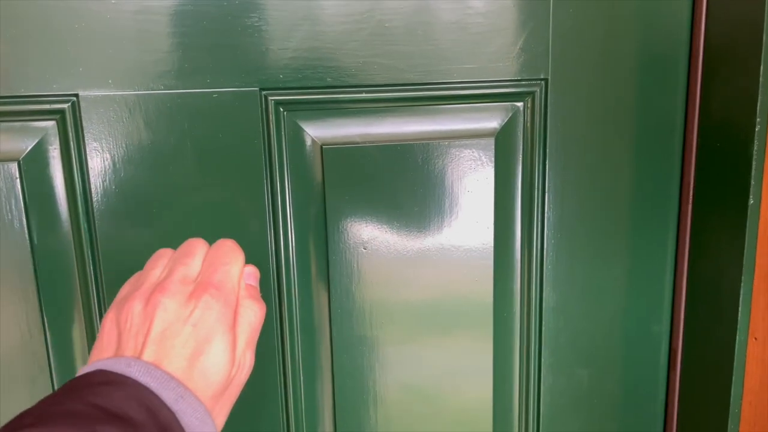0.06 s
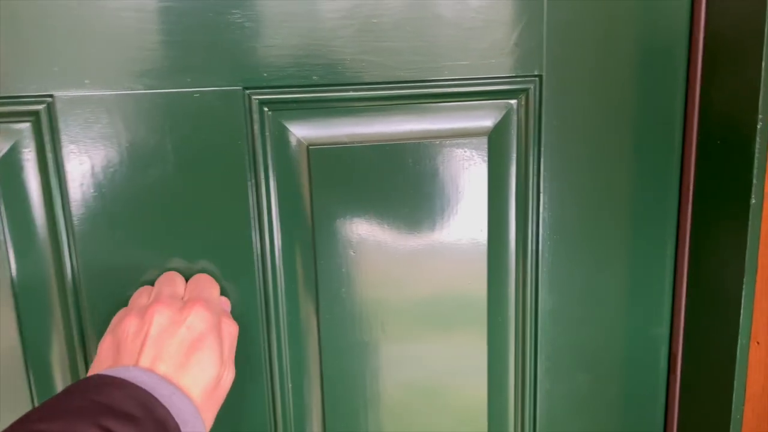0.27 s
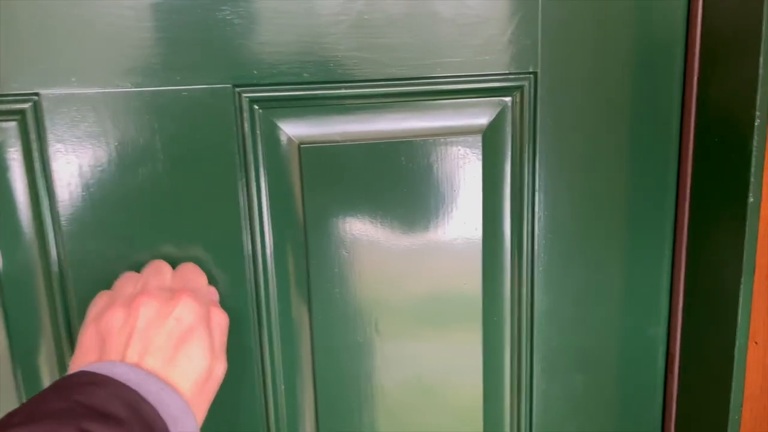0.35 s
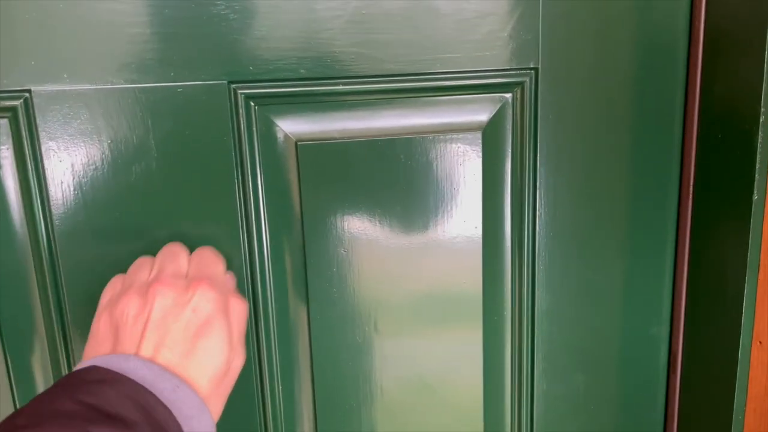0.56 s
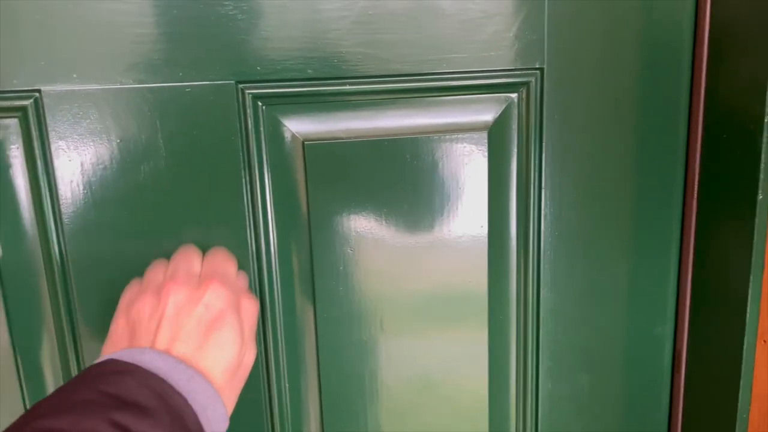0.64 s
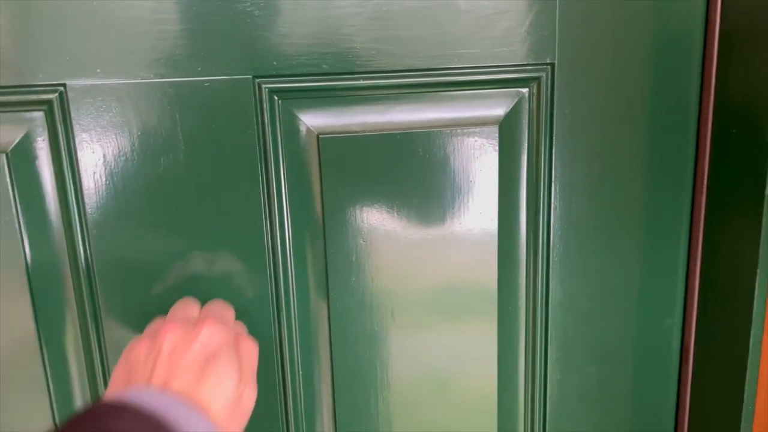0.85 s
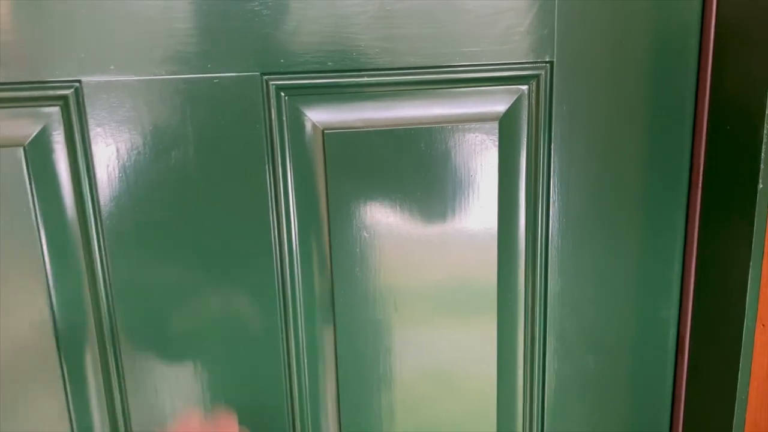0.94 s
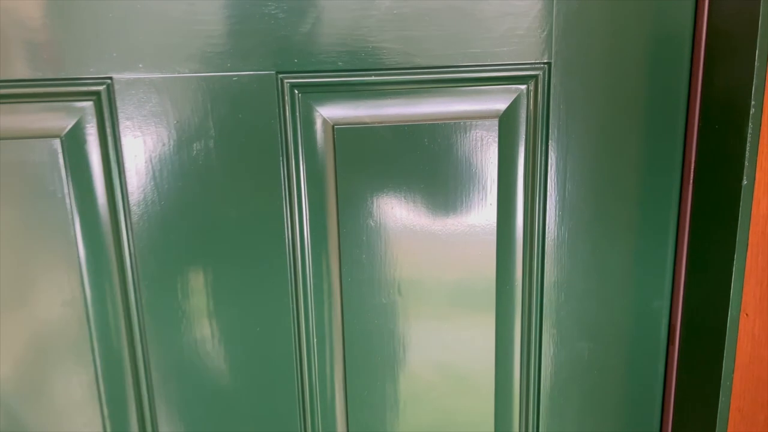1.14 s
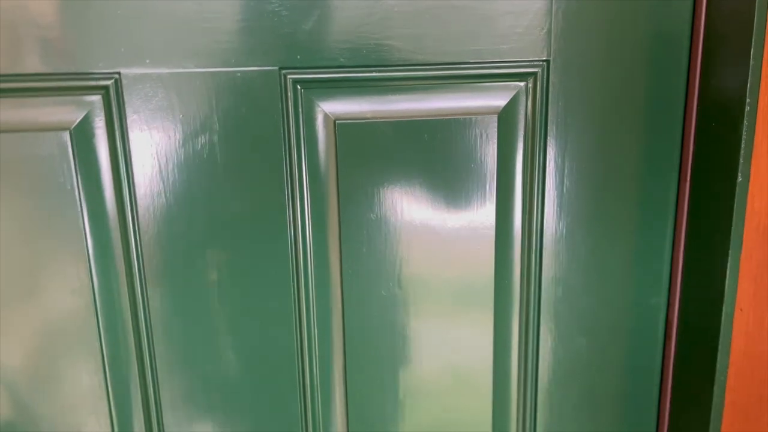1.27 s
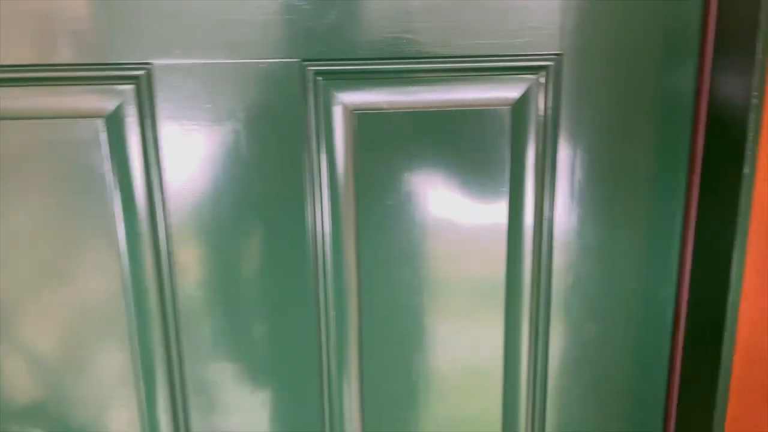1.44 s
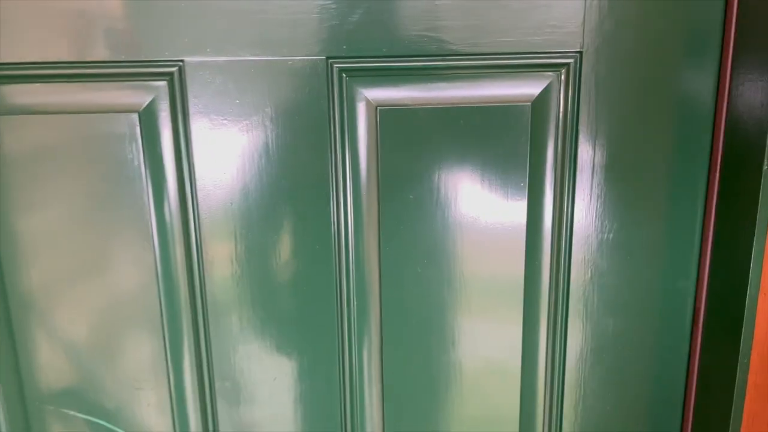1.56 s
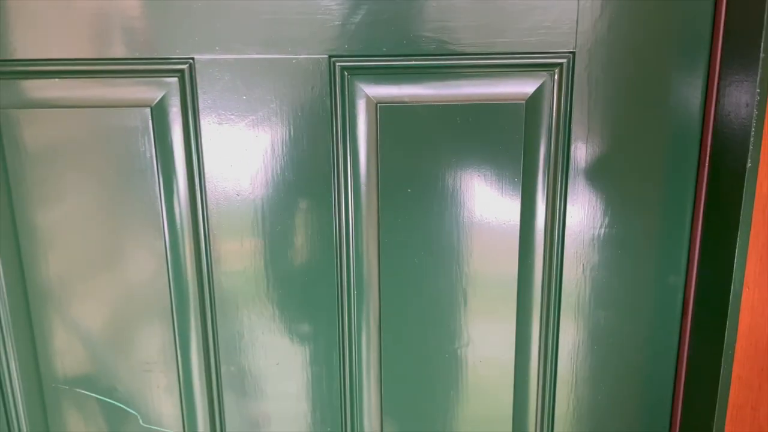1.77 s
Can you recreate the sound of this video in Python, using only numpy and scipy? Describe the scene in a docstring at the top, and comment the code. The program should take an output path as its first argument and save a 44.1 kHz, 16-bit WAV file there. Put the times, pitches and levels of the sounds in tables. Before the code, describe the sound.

Three evenly spaced knuckle knocks on a wooden panelled door, boomy with a dry bony tick, then a jacket sleeve rustles and feet shift on the floor; close stereo microphone in a small porch, faint outdoor air.

```python
"""Knocks on a panelled door

Three quick knuckle knocks on wood, heard in stereo from close by in a small porch.
The door is sine modes with a gliding boom; panels, porch echo and paint clicks are dying noise bands.
A sleeve rustles as shaped noise, loudest when the arm drops; feet shift, ringing the floor's modes.
Outdoors lie soft noise bands and a wavering low drone, with a few dull low bumps."""
import sys
import numpy as np
from scipy import signal
from scipy.fft import rfft, irfft
from scipy.io import wavfile
from scipy.ndimage import map_coordinates

SR = 44100
rng = np.random.default_rng(int(sys.argv[2]) if len(sys.argv) > 2 else 0)


def master_out(mix):
    """Clip the mix to full scale and print it as 16-bit PCM to the path in sys.argv[1]."""
    frames = np.transpose(np.atleast_2d(mix))
    ceiling = np.clip(frames, -1, 1)
    pcm = np.round(ceiling * 32767).astype(np.int16)
    wavfile.write(sys.argv[1], SR, pcm)


N = 79380
T = np.arange(N) / SR
BANDS_HZ = 25 * 2 ** np.arange(0, 9.6, .5)  # half-octave centres
BIN_HZ = np.maximum(np.arange(N // 2 + 1) * SR / N, 1)

# Outdoor air, before its swells. Each row: frequency in Hz, level in dB per half octave.
AIR_SPECTRUM = [(25, -83), (36, -63.5), (50, -54.5), (85, -46), (130, -50), (200, -60), (300, -58.5),
                (500, -64), (1000, -61.5), (1900, -58.5), (2600, -70.5), (4500, -78), (7500, -94.5),
                (14000, -102)]
# Rise and fall of the air. Each row: time in seconds, low-mid change in dB, upper-mid change in dB.
AIR_LEVEL = [(0, 16.5, 9), (0.151, -7, -3), (0.401, -3.5, -6), (.58, -1, 7), (0.852, -2.5, -4),
             (1.1, -8, -0.5), (1.5, 0.5, -3.5), (1.65, -3.5, -3), (1.8, -5, 1)]
AIR_LOW_HZ, AIR_UPPER_HZ = 232, 1800  # centres of those two regions
# Drone of a distant machine, before its wavering. Each row: frequency in Hz, level in dB.
DRONE_TONES = [(40.8, -37), (83, -38.5)]
AIR_PAN_DB, AIR_SWELL_DB, DRONE_WAVER_DB = 2.5, 3, 0.5
DRONE_DRIFT = .015  # fraction of the frequency

# Soft low bumps. Each row: start in seconds, level in dB.
BUMPS = [(0.0, -20), (0.086, -25.5), (1.234, -27), (1.548, -21.5)]
BUMP_HZ, BUMP_S = 85.2, 0.038

# Movement of the sleeve. Each row: time in seconds, level in dB.
SLEEVE_MOVE = [(0, -44.5), (.18, -19.5), (.4, -32), (.56, -27.5), (.81, -27.5), (.89, -16), (1.06, -17.5),
               (1.19, -11), (1.23, -4), (1.34, -5.5), (1.39, -9), (1.48, -14), (1.53, -6.5), (1.62, -21),
               (1.8, -14.5)]
# Cloth rubbing, before the movement. Each row: frequency in Hz, level in dB per half octave.
CLOTH_SPECTRUM = [(400, -71.5), (1000, -46), (2000, -53), (3800, -52), (5500, -54), (8000, -59.5),
                  (11000, -53), (14000, -51)]
CLOTH_GRAIN_DB, CLOTH_GRAIN_HZ = 1.5, 93

# Knocks. Each row: start in seconds, level in dB, hardness in dB at 1.5 kHz, boom level in dB.
KNOCKS = [(0.2059, -3.5, -3, -3.5), (0.4413, -1.5, -2, -2), (0.6769, -1, 5, 0.5)]
# Modes of the door, before each knock's level. Each row: frequency in Hz, level in dB, t60 in seconds.
DOOR_MODES = [(51.3, -15.5, 0.46), (112.1, -20, 0.56), (144, -23.5, 0.43), (187.1, -20, 0.29),
              (257.3, -13.5, .22), (276, -14, .2), (308.6, -19, 0.25), (334.4, -15.5, 0.23),
              (359, -18.5, 0.11), (396.7, -29, 0.27), (432, -20, .18), (516.8, -22.5, 0.22),
              (547, -14.5, 0.15), (602, -26, 0.17), (639.4, -23, 0.13), (768, -22, 0.1), (945, -28, 0.14),
              (1023.6, -28.5, 0.12), (1080, -30, 0.067), (1347, -39, 0.085), (1622, -44.5, .12),
              (1830, -34.5, 0.22), (2035, -27.5, 0.075), (2278, -39, 0.037)]
# Dense ring of panels and frame, likewise. Each row: frequency in Hz, level in dB, t60 in seconds.
PANEL_RING = [(117, -19, 0.061), (346, -14, 0.18), (620, -18.5, 0.045), (1000, -24, 0.088),
              (1400, -27.5, 0.095), (1760, -29.5, 0.1), (2760, -51.5, 0.045), (5000, -63.5, 0.074)]
# Echo of the porch, likewise. Each row: frequency in Hz, level in dB, t60 in seconds.
PORCH_ECHO = [(150, -28.5, 0.14), (342, -32, 0.39), (600, -32.5, 0.27), (1010, -32, .19),
              (1860, -39.5, 0.12), (2800, -54, 0.14), (5000, -67.5, 0.45)]
BEND_LAG_S = 0.00573  # arrival of bending waves at 100 Hz; higher ones come sooner
RISE_CYCLES = .8  # build-up of a mode
MODE_SCATTER_DB = 1  # each blow excites the modes a little differently
PANEL_RISE_S, PORCH_RISE_S = 0.004, 0.021
DOOR_PAN_DB, PANEL_PAN_DB = 2.5, 3.5  # left over right
WOOD_LAG_S = .0003  # right microphone after left
# The leaf's boom starts high and settles as the slower bending waves arrive.
BOOM_HZ, BOOM_START_HZ, BOOM_SETTLE_S = 75.7, 157, 0.0083
BOOM_DB, BOOM_LAG_S, BOOM_RISE_S, BOOM_HOLD_S, BOOM_T60_S = -6, 0.0029, 0.0035, 0.035, 0.3

# Single knuckles on the paint. Each row: start in seconds, level in dB.
CLICKS = [(0.2111, -4), (0.2133, 0), (0.2168, -14), (0.223, -8.5), (0.4448, -16), (0.449, -12.5),
          (0.6793, -13), (0.685, -5)]
# Dry tick of bone on paint. Each row: frequency in Hz, level in dB, t60 in seconds.
CLICK_TICK = [(1500, -32, 0.0083), (2800, -33.5, 0.015), (4400, -34, 0.029), (7030, -46, 0.012),
              (12040, -39.5, 0.01), (15200, -50.5, .014)]
# Echo of the click. Each row: frequency in Hz, level in dB, t60 in seconds.
CLICK_ECHO = [(2000, -56, 0.11), (3200, -50, 0.14), (4600, -42.5, 0.086), (7500, -64.5, .09),
              (12000, -51, .08)]
CLICK_RISE_S, CLICK_ECHO_LAG_S, CLICK_PAN_DB = 0.001, .002, -2
SNAP_DB, SNAP_HZ, SNAP_T60_S = -24.5, 11400, 0.00081  # first touch of bone on the hard paint

# Footfalls and scuffs.
# Each row: start in seconds, level in dB, brightness in dB at 1.5 kHz, rise in seconds, floor ring in dB.
STEPS = [(1.2, -5.5, 17, 0.025, -7), (1.258, 2, -1, 0.0008, -8), (1.313, -2.5, -2.5, 0.0036, 3.5),
         (1.333, -3, 3, 0.0024, -2), (1.7079, -6.5, -14, 0.0011, -11)]
# Modes of the floor, before each step's level. Each row: frequency in Hz, level in dB, t60 in seconds.
FLOOR_MODES = [(250.6, -29, .25), (332.4, -35.5, 0.345), (371, -32, 0.13), (548, -71, .13), (649, -44, .2),
               (740, -67, 0.14)]
# Scuff of a sole, before each step's level. Each row: frequency in Hz, level in dB, t60 in seconds.
SOLE_SCUFF = [(101, -68, .15), (202, -49, 0.6), (360, -30.5, 0.1), (750, -47, 0.31), (1260, -46, .14),
              (2480, -55, 0.09), (5000, -63, 0.14)]

# How unlike the two channels are. Each row: frequency in Hz, side level relative to mid in dB.
WIDTH = [(40, -24), (150, -9), (400, -6), (1000, 2.5), (5000, -1.5), (9000, 3.5), (14000, -18)]
# The left microphone is more sensitive in the treble. Each row: frequency in Hz, left over right in dB.
MIC_BALANCE = [(2000, 0.5), (3200, 3.5), (5000, 10), (7000, 3.5), (9000, -0.5)]
LOW_CUT_HZ, TOP_HZ = 24.3, 14500


def amp(db):
    """Decibels to gain."""
    return 10 ** (np.asarray(db) / 20)


def at(table, hz, col=1):
    """Read a column of a table on a log-frequency axis."""
    rows = np.array(table, float)
    return np.interp(np.log(hz), np.log(rows[:, 0]), rows[:, col])


def pan(db):
    """Gains for left and right, db apart."""
    return amp(np.array([[db], [-db]]) / 2)


def walk(hz):
    """Smooth chance with a spread near one, through hz random points a second."""
    return map_coordinates(rng.standard_normal(1000), [T * hz], order=3, mode="mirror")


def delay(x, s):
    """Both channels, s seconds later."""
    samples = max(int(s * SR), 0)
    return np.pad(x, ((0, 0), (samples, 0)))[:, :N]


def fade(t60, t=T):
    """Exponential decay by 60 dB in t60 seconds."""
    return np.exp(-np.log(1000) * t / t60)


def bands(table):
    """Half-octave stereo noises of unit level over a table's range, their width set by frequency."""
    mid, side = rfft(rng.standard_normal((2, N)))
    width = amp(at(WIDTH, BIN_HZ))
    both = mid + width * side * np.array([[1], [-1]])
    lowest, highest = table[0][0] / np.sqrt(2), table[-1][0] * np.sqrt(2)
    for hz in BANDS_HZ:
        if lowest < hz < highest:
            offset = np.clip(2 * np.log2(BIN_HZ / hz), -1, 1)
            noise = irfft(both * np.cos(np.pi / 2 * offset) ** 2, N)
            yield hz, noise / noise.std()


def air_db(hz):
    """Level of one band of the outdoor air over time, its low and upper mids moving separately."""
    s, low_db, upper_db = np.array(AIR_LEVEL).T
    octaves = np.log2(hz / np.array([AIR_LOW_HZ, AIR_UPPER_HZ]))
    low, upper = np.exp(-.5 * octaves ** 2)
    return at(AIR_SPECTRUM, hz) + np.interp(T, s, low * low_db + upper * upper_db)


def outdoors():
    """Soft distant noise swelling band by band, and a low drone wavering in level and pitch."""
    out = 0
    for hz, noise in bands(AIR_SPECTRUM):
        out = out + noise * amp(air_db(hz) + AIR_SWELL_DB * walk(6))
    for hz, db in DRONE_TONES:
        level = amp(db + DRONE_WAVER_DB * walk(3.6))
        cycles = np.cumsum(hz * (1 + DRONE_DRIFT * walk(5.1))) / SR
        out = out + level * np.sin(2 * np.pi * cycles)
    return out * pan(AIR_PAN_DB)


def bumps():
    """Dull swells of a few low cycles."""
    shape = np.sin(np.pi * np.minimum(T / BUMP_S, 1)) ** 2
    bump = shape * np.sin(2 * np.pi * BUMP_HZ * T) * pan(AIR_PAN_DB)
    return sum(amp(db) * delay(bump, s) for s, db in BUMPS)


def sleeve():
    """Cloth slides on cloth: shaped noise with a fine uneven grain, its level following the movement."""
    s, db = np.array(SLEEVE_MOVE).T
    move = amp(np.interp(T, s, db) + CLOTH_GRAIN_DB * walk(CLOTH_GRAIN_HZ))
    return move * sum(noise * amp(at(CLOTH_SPECTRUM, hz)) for hz, noise in bands(CLOTH_SPECTRUM))


def treble(hz, db):
    """Gain of a harder contact: no change up to 300 Hz, db at 1.5 kHz and above."""
    return amp(db * np.clip(np.log(hz / 300) / np.log(5), 0, 1))


def burst(table, noises, rise_s, hard_db):
    """Many close resonances struck together, each band dying at its own rate."""
    out = 0
    for hz, noise in noises:
        level = amp(at(table, hz)) * treble(hz, hard_db)
        out = out + noise * level * fade(at(table, hz, 2))
    return np.minimum(T / rise_s, 1) * out


def to_microphones(x):
    """Sound of the wood reaches the left microphone first and louder."""
    right = np.interp(T - WOOD_LAG_S, T, x)
    return np.array([x, right]) * pan(DOOR_PAN_DB)


def ring(modes, hard_db):
    """Modes of a wooden plate: the low ones arrive later and build up more slowly."""
    out = 0
    for hz, db, t60 in modes:
        t = np.maximum(T - BEND_LAG_S * np.sqrt(100 / hz), 0)
        cycles = t * hz * (1 + 0.0039 * rng.standard_normal())  # slight mistuning
        level = amp(db + MODE_SCATTER_DB * rng.standard_normal()) * treble(hz, hard_db)
        shape = (1 - np.exp(-cycles / RISE_CYCLES)) * fade(t60, t)
        out = out - level * shape * np.cos(2 * np.pi * cycles)
    return to_microphones(out)


def boom():
    """The whole leaf booms: a quick downward glide, a short hold and a decay."""
    hz = BOOM_HZ + (BOOM_START_HZ - BOOM_HZ) * np.exp(-T / BOOM_SETTLE_S)
    rise = 1 - np.exp(-T / BOOM_RISE_S)
    shape = rise * fade(BOOM_T60_S, np.maximum(T - BOOM_HOLD_S, 0))
    tone = -amp(BOOM_DB) * shape * np.sin(2 * np.pi * np.cumsum(hz) / SR)
    return delay(to_microphones(tone), BOOM_LAG_S)


def knocks():
    """The knuckles hit the same spot each time: boom, modes, panel ring and porch echo."""
    # the same noises serve every knock
    panel_noises, porch_noises = list(bands(PANEL_RING)), list(bands(PORCH_ECHO))
    out = 0
    for s, db, hard_db, boom_db in KNOCKS:
        panels = burst(PANEL_RING, panel_noises, PANEL_RISE_S, hard_db) * pan(PANEL_PAN_DB)
        porch = burst(PORCH_ECHO, porch_noises, PORCH_RISE_S, hard_db)
        wood = ring(DOOR_MODES, hard_db) + panels
        out = out + delay(amp(db) * (wood + porch) + amp(boom_db) * boom(), s)
    return out


def clicks():
    """The knuckles land a few milliseconds apart, each with a snap, a dry tick and a faint echo."""
    snap = amp(SNAP_DB) * fade(SNAP_T60_S) * np.sin(2 * np.pi * SNAP_HZ * T)
    echo = delay(burst(CLICK_ECHO, bands(CLICK_ECHO), PORCH_RISE_S, 0), CLICK_ECHO_LAG_S)
    tick = burst(CLICK_TICK, bands(CLICK_TICK), CLICK_RISE_S, 0) * pan(CLICK_PAN_DB)
    click = snap + tick + echo
    return sum(amp(db) * delay(click, s) for s, db in CLICKS)


def steps():
    """Soles scuff and settle as noise bursts, ringing the modes of the floor."""
    out = 0
    for s, db, hard_db, rise_s, ring_db in STEPS:
        floor = amp(ring_db) * ring(FLOOR_MODES, hard_db)
        scuff = burst(SOLE_SCUFF, bands(SOLE_SCUFF), rise_s, hard_db)
        out = out + amp(db) * delay(floor + scuff, s)
    return out


def scene():
    """Everything at the door."""
    return knocks() + clicks() + steps() + bumps() + sleeve() + outdoors()


def record(dry):
    """Unequal microphones, a low cut, rounded peaks and a steep top cut."""
    balance_db = at(MIC_BALANCE, BIN_HZ)
    microphones = amp(np.array([balance_db, -balance_db]) / 2)
    low_cut = 1 / np.sqrt(1 + (LOW_CUT_HZ / BIN_HZ) ** 8)
    x = irfft(rfft(dry) * microphones * low_cut, N)
    rounded = x / (1 + x ** 8) ** (1 / 8)
    top_cut = signal.ellip(10, .2, 80, TOP_HZ, fs=SR, output="sos")
    return signal.sosfilt(top_cut, rounded)


dry = scene()
out = record(dry)
master_out(out)
```